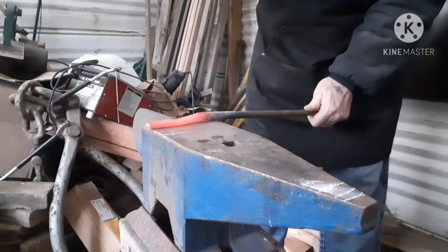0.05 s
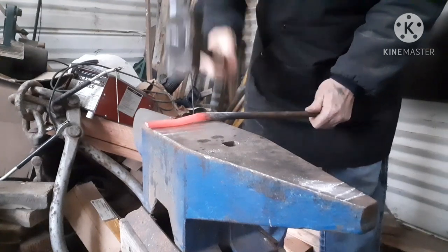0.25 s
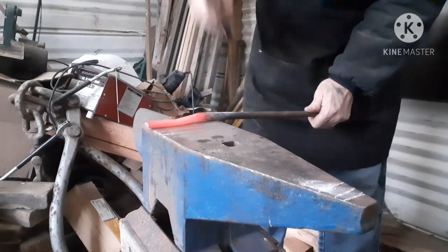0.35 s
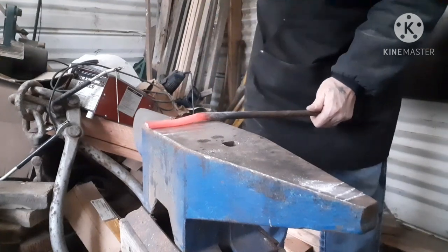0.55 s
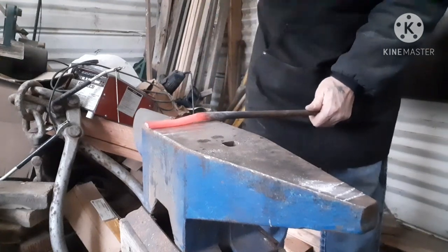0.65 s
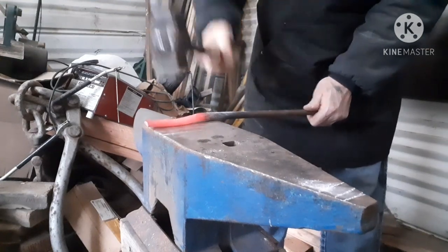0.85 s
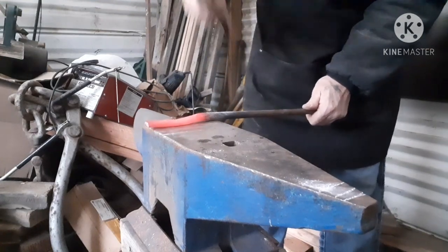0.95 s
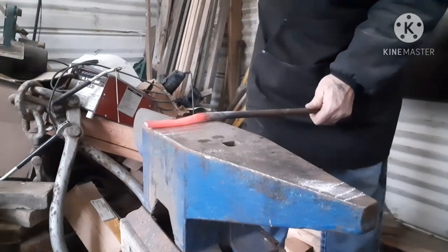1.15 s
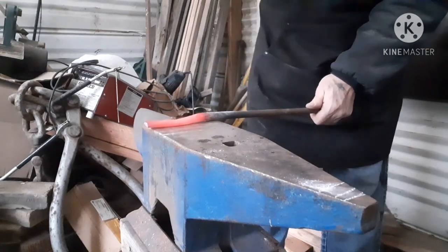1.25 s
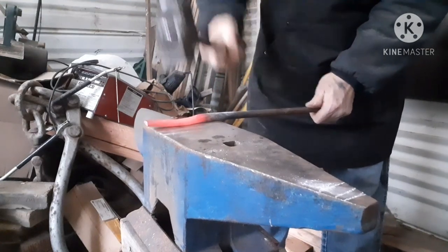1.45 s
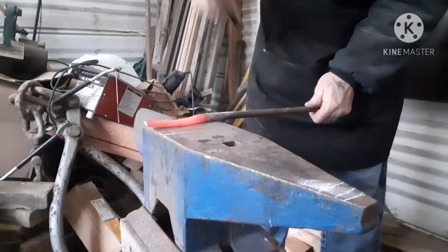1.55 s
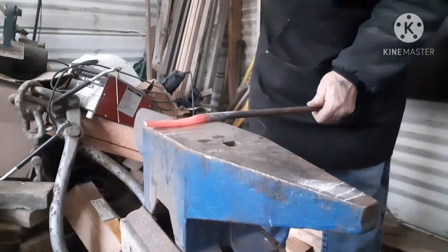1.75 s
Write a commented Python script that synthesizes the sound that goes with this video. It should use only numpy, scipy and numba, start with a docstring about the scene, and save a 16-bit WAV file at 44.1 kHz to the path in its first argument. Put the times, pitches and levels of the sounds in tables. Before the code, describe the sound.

A hand hammer strikes a hot bar on an anvil three times, evenly, in a metal shed

```python
"""Hammer blows on an anvil

A hand hammer strikes a hot steel bar on an anvil three times in a sheet-metal workshop.
Each blow is a dull damped crack and a thump; the anvil rings in beating pairs of decaying sine modes.
Resonant noise adds the clang, and banded decaying noise the dense tail of the shed.
A forge murmurs and something rustles, both as shaped noise; the recorder's limiter flattens each blow."""
import sys
import numpy as np
from scipy import signal
from scipy.io import wavfile
from numba import njit

SR = 44100
rng = np.random.default_rng(int(sys.argv[2]) if len(sys.argv) > 2 else 0)


def elevation(decibels):
    """Turn decibel levels (scalar or array-like) into linear amplitude ratios."""
    levels = np.asarray(decibels, float)
    return 10 ** (levels / 20)


def master_out(mix):
    """Clip the mix to full scale and print it as 16-bit PCM to the path in sys.argv[1]."""
    frames = np.transpose(np.atleast_2d(mix))
    ceiling = np.clip(frames, -1, 1)
    pcm = np.round(ceiling * 32767).astype(np.int16)
    wavfile.write(sys.argv[1], SR, pcm)


N = 79380   # samples: 1.8 s

# The hammer blows. Each row: time in seconds, strength in dB, strength of thump and boom in dB,
# extra treble of clang and tail in dB, extra strength of the upper anvil modes in dB.
BLOWS = [(0.2267, -5.5, -5, 1.5, -1.5), (0.8243, -6, -2, 4, 2.5), (1.4254, -7, -2.5, 6.5, 3.5)]
# Likeness of the two ears in forge and rustle. Each row: frequency in Hz, correlation from -1 to 1.
BACKGROUND_ALIKE = [(60, 0.99), (300, 0.92), (640, 0.23), (1400, -0.021), (15000, 0.14)]


def rms_one(x):
    """Normalization: scale a signal to unit root-mean-square."""
    return x / np.sqrt(np.mean(x ** 2) + 1e-20)


def at_hz(points, hz):
    """Interpolation on a logarithmic frequency axis, as pitch is heard."""
    table_hz, values = np.array(points).T
    return np.interp(np.log(hz), np.log(table_hz), values)


def drift(rate):
    """Slow random fluctuation of unit rms: noise through two equal low-pass poles at rate (Hz)."""
    hop, run_in = 40, 2000   # samples per slow value; slow values dropped while the filter settles
    pole = np.exp(-2 * np.pi * rate * hop / SR)
    white = rng.standard_normal(N // hop + run_in + 2)
    slow = signal.lfilter([1], [1, -2 * pole, pole * pole], white)[run_in:]
    return np.interp(np.arange(N) / hop, np.arange(len(slow)), rms_one(slow))


def ring(clicks, hz, t60):
    """Impulse response of a damped mode: a unit click starts a sine of height 1, 60 dB down after t60 (s)."""
    radius, angle = elevation(-60 / (t60 * SR)), 2 * np.pi * hz / SR
    feedback = [1, -2 * radius * np.cos(angle), radius * radius]
    return signal.lfilter([0, np.sin(angle)], feedback, clicks + 1e-18)


def twins(clicks, pair, t60, twin):
    """Beating: two close modes start in opposite phase, so that the ring swells and beats."""
    return ring(clicks, pair[0], t60) - twin * ring(clicks, pair[1], t60)


def clicks_at_blows(db):
    """Impulsive excitation: one click at each blow, of the given level in dB."""
    clicks = np.zeros(N)
    clicks[(np.array(BLOWS)[:, 0] * SR).astype(int)] = elevation(db)
    return clicks


def swell(start, rise, t60):
    """Build-up and decay of energy: exponential rise (time constant, s), then 60 dB of fall per t60 (s)."""
    t = np.maximum(np.arange(N) / SR - start, 0)
    return (1 - np.exp(-t / rise)) * elevation(-60 * t / t60)


def bands(spectrum, likeness):
    """Partly correlated stereo noise: yields quarter-octave bands (centre Hz, noise) of fixed total power."""
    edges = 30 * 2 ** np.arange(0, 9.2, .25)
    run_in = SR // 5   # samples dropped while the filters settle
    white = rng.standard_normal((2, 2, N + run_in))
    centres = np.sqrt(edges[1:] * edges[:-1])
    gains = elevation(at_hz(spectrum, centres))
    gains = gains / np.sqrt(np.sum(gains ** 2 * np.diff(edges)) * 2 / SR)
    for k, centre in enumerate(centres):
        band_pass = signal.butter(2, edges[k:k + 2], "band", fs=SR, output="sos")
        # neighbouring bands draw on different noise
        mid, side = signal.sosfilt(band_pass, white[k % 2])[:, run_in:]
        alike = at_hz(likeness, centre)
        stereo = np.sqrt(1 + alike) * mid + np.sqrt(1 - alike) * side * [[1], [-1]]
        yield centre, gains[k] * stereo


def forge():
    """Broadband noise with slow level modulation: a steady murmur, a little lumpy."""
    # Spectrum of the murmur. Each row: frequency in Hz, relative level in dB per Hz.
    forge_spectrum = [(40, -7), (60, 0), (85, 4), (125, -6.5), (160, -5), (230, -4.5), (330, -11),
                      (900, -11.5), (2500, -15), (4400, -21), (7700, -32.5), (15200, -30.5), (16500, -49)]
    lumps = drift(2.0)
    murmur = np.zeros((2, N))
    for hz, noise in bands(forge_spectrum, BACKGROUND_ALIKE):
        # the shared lumps weaken above 150 Hz; each band also wavers on its own
        wavering_db = 0.99 * lumps * min(1, 150 / hz) + 0.53 * drift(7.7)
        murmur += noise * elevation(wavering_db)
    return elevation(-53) * murmur


def rustle():
    """Noise under overlapping envelopes of rise and decay: faint, fluttering swishes."""
    # Spectrum of the swishes. Each row: frequency in Hz, relative level in dB per Hz.
    rustle_spectrum = [(150, -14), (300, -4), (700, -1.5), (1400, -3), (3000, -7), (6000, -15),
                       (11700, -23), (16000, -42)]
    # The swishes. Each row: start in seconds, gain in dB, rise time constant in seconds, T60 in seconds.
    swishes = [(0, -52.5, 0.0029, 0.26), (.13, -47, 0.035, 0.48), (.53, -47.5, 0.012, 0.41),
               (0.721, -44, 0.011, 0.64), (1.028, -44, 0.008, 0.46), (1.28, -50, 0.022, 0.52),
               (1.669, -46.5, 0.01, 0.52)]
    shape = sum(elevation(db) * swell(s, rise, t60) for s, db, rise, t60 in swishes)
    flutter = elevation(1.2 * drift(30.0))
    return shape * flutter * sum(noise for _, noise in bands(rustle_spectrum, BACKGROUND_ALIKE))


def crack():
    """Short contact pulse: soft hot steel gives a dull suction pulse, which nearby surfaces return inverted."""
    # The early echoes. Each row: delay in seconds, level in dB relative to the crack.
    early_echoes = [(.0041, -10), (.0094, -8.5), (0.0102, -8.5), (0.0127, -13.5)]
    strength_db = np.array(BLOWS)[:, 1]
    pulse = ring(clicks_at_blows(strength_db + 12), hz=750, t60=.002)
    echoes = sum(elevation(echo_db) * np.roll(pulse, int(s * SR)) for s, echo_db in early_echoes)
    return echoes - pulse


def thump():
    """Damped low modes of the anvil stand, pushing back; the left ear hears them later."""
    # Modes of the stand. Each row: frequency in Hz, level in dB, T60 in seconds.
    stand_modes = [(91, -7.5, 0.045), (160.5, -3.5, 0.032), (236.5, -27, 0.18)]
    thump_db = np.array(BLOWS)[:, 2]
    push = sum(ring(clicks_at_blows(thump_db + level_db), hz, t60) for hz, level_db, t60 in stand_modes)
    left_lag_s = .0012
    return np.array([np.roll(push, int(left_lag_s * SR)), push])


def boom():
    """Room resonance: the shed booms on in beating pairs of low modes."""
    # Pairs of shed modes. Each row: frequency in Hz, frequency of the twin in Hz.
    boom_pairs = [(75, 85), (226, 240)]
    # Ringing of each pair. Each row: level in dB, T60 in seconds, share of the twin from 0 to 1.
    boom_ringing = [(-39, 1.18, 0.77), (-35.5, 0.92, 0.64)]
    thump_db = np.array(BLOWS)[:, 2]
    return sum(twins(clicks_at_blows(thump_db + level_db), pair, t60, twin)
               for pair, (level_db, t60, twin) in zip(boom_pairs, boom_ringing))


def anvil():
    """Modal vibration in beating pairs; each ear hears its own mix, the right two samples later."""
    # Pairs of anvil modes. Each row: frequency in Hz, frequency of the twin in Hz.
    anvil_pairs = [(753, 745), (878, 884), (940, 946), (1083, 1077), (1483, 1489), (1884, 1892),
                   (2492, 2487), (3161, 3152), (3439, 3433), (4240, 4246), (5310, 5317)]
    # Ringing of each pair. Each row: mean level in dB, T60 in seconds, share of the twin from 0 to 1.
    anvil_ringing = [(-18, 0.34, 0), (-18, 0.31, .6), (-22, 0.22, 0.21), (-8, 0.15, 0.17), (-20.5, 0.26, 1),
                     (-35.5, 0.73, 0.17), (-6, 0.36, 0.77), (-15, 0.39, 0.44), (-31, 0.1, 0.19),
                     (-23.5, 0.31, 0.32), (-23, 0.41, 0.26)]
    _, strength_db, _, _, upper_db = np.transpose(BLOWS)
    out = np.zeros((2, N))
    for pair, (level_db, t60, twin) in zip(anvil_pairs, anvil_ringing):
        for ear in range(2):
            click_db = strength_db + level_db + upper_db * (pair[0] > 3000)
            # the level of a mode varies from blow to blow and ear to ear
            click_db = click_db + rng.normal(0, 1.2, len(strength_db))
            out[ear] += np.roll(twins(clicks_at_blows(click_db), pair, t60, twin), ear * 2)
    return out


def clang():
    """High modal density: hammer and bar modes too dense to tell apart, as noise in broad resonances."""
    # Clusters of modes. Each row: centre frequency in Hz, width in Hz.
    clusters = [(2500, 150), (3350, 250), (4150, 250), (5400, 350), (7000, 200), (10000, 300), (12400, 400),
                (14300, 400)]
    # Level of each cluster in dB.
    cluster_levels = [-13, -13.5, -24.5, -18, -17.5, -20, -17, -14.5]
    white = rng.standard_normal((2, N))
    clusters_sound = np.zeros((2, N))
    for (hz, bandwidth), level_db in zip(clusters, cluster_levels):
        radius = np.exp(-np.pi * bandwidth / SR)
        feedback = [1, -2 * radius * np.cos(2 * np.pi * hz / SR), radius * radius]
        clusters_sound += elevation(level_db) * rms_one(signal.lfilter([1, 0, -1], feedback, white))
    shape = sum(elevation(db + treble_db) * swell(s, rise=0.012, t60=0.25) for s, db, _, treble_db, _ in BLOWS)
    return clusters_sound * shape


def shed_tail():
    """Reverberation: dense reflections as noise, dying band by band, much alike at every blow."""
    # Spectrum of the shed's answer. Each row: frequency in Hz, relative level in dB per Hz.
    tail_spectrum = [(40, 11), (80, -13.5), (200, -7.5), (400, -8), (650, -6), (870, -1.5), (1300, -7),
                     (2000, -7.5), (3200, -16.5), (5300, -18), (7000, -26), (8200, -25.5), (10000, -21.5),
                     (14200, -21), (16000, -30)]
    # Decay of the tail. Each row: frequency in Hz, T60 in seconds.
    tail_decay = [(60, 0.11), (150, 0.25), (300, 0.3), (1000, 0.29), (3000, 0.35), (8000, 0.34),
                  (15000, 0.23)]
    # Likeness of the two ears. Each row: frequency in Hz, correlation from -1 to 1.
    tail_likeness = [(60, 0.94), (300, 0.73), (700, 0.24), (1400, -0.15), (4000, 0.04), (15000, -0.15)]
    same_share = .8   # share of the tail's power that repeats from blow to blow
    out = np.zeros((2, N))
    for hz, noise in bands(tail_spectrum, tail_likeness):
        bright = np.clip(np.log2(hz / 2000) / 3, 0, 1)   # the extra treble grows from 2 kHz upward
        for k, (s, db, _, treble_db, _) in enumerate(BLOWS):
            start = int(s * SR)
            same = noise[:, :N - start]
            fresh = np.roll(noise, -(k + 1) * N // 4, axis=1)[:, :N - start]
            answer = np.sqrt(same_share) * same + np.sqrt(1 - same_share) * fresh
            envelope = swell(s, 0.001, at_hz(tail_decay, hz))[start:]
            out[:, start:] += elevation(-4 + db + bright * treble_db) * envelope * answer
    # sound through stand and floor arrives first
    early_s, early_db = 0.0012, -35.5
    return out + elevation(early_db) * np.roll(out, -int(early_s * SR), axis=1)


def scene():
    """Superposition of all sources, placed a little to the right by a level difference."""
    blows = crack() + thump() + boom() + anvil() + clang() + shed_tail()
    left_db = -0.58   # the right side gets the opposite
    return (forge() + rustle() + blows) * elevation([[left_db], [-left_db]])


@njit
def follow(power, attack, release):
    """Envelope detection: one-pole smoothing of power, quick up and slower down."""
    out, state = np.empty_like(power), 0.
    for i in range(len(power)):
        rate = attack if power[i] > state else release
        state += rate * (power[i] - state)
        out[i] = state
    return out


def band_limit(x):
    """A steep low-pass at the top of the band."""
    return signal.sosfilt(signal.butter(12, 16620, fs=SR, output="sos"), x)


def record(dry):
    """Dynamic range compression: a limiter turns down what exceeds its level; peaks are rounded, the top cut."""
    low_cut = signal.butter(3, 60, "high", fs=SR, output="sos")
    dry = signal.sosfilt(low_cut, dry)
    attack_s, release_s = .002, 0.005
    power = follow(np.mean(dry ** 2, axis=0), 1 / (attack_s * SR), 1 / (release_s * SR))
    limit_db, slope = -15.5, 0.77   # slope: dB of reduction per dB over the limit
    over_db = np.maximum(10 * np.log10(power + 1e-12) - limit_db, 0)
    limited = dry * elevation(-slope * over_db)
    peak_top = 1.3   # ceiling of the rounded peaks
    rounded = peak_top * np.tanh(limited / peak_top)
    top_cut = signal.cheby2(12, 70, 16700, fs=SR, output="sos")   # 70 dB down from 16.7 kHz
    return band_limit(signal.sosfilt(top_cut, rounded))


dry = scene()
out = record(dry)
master_out(out)
```